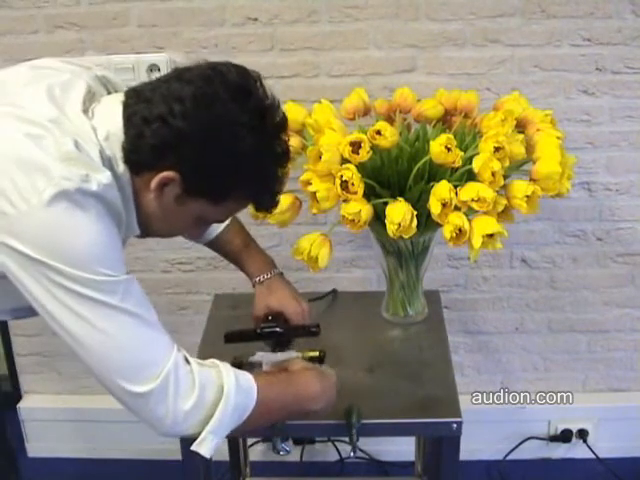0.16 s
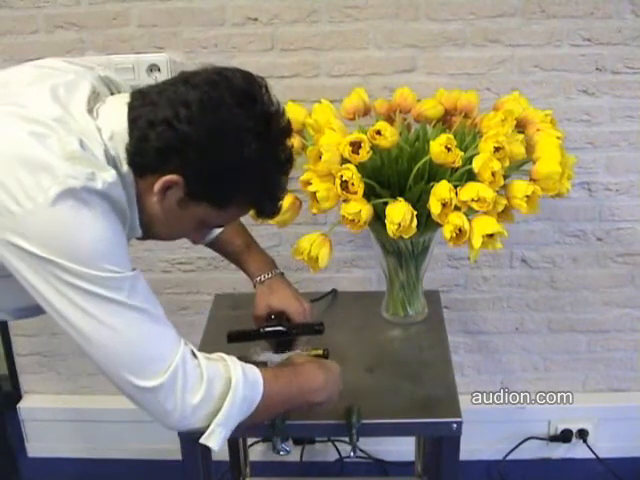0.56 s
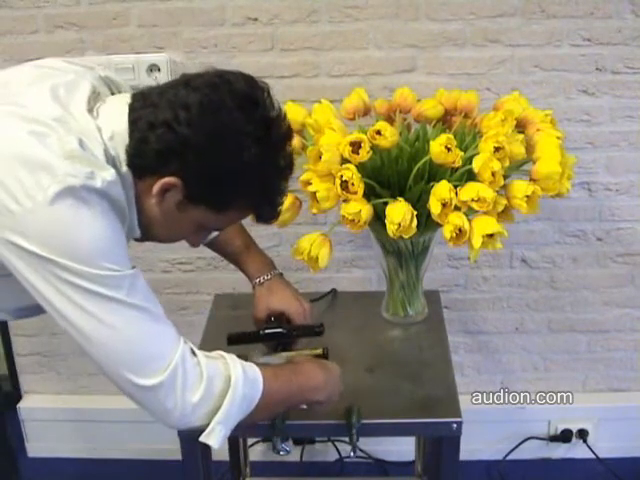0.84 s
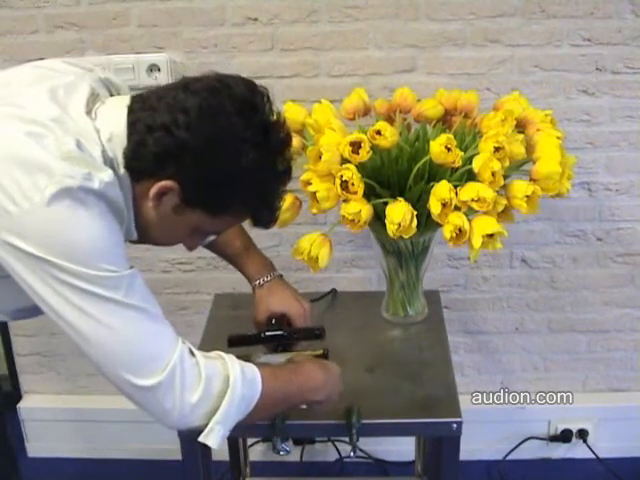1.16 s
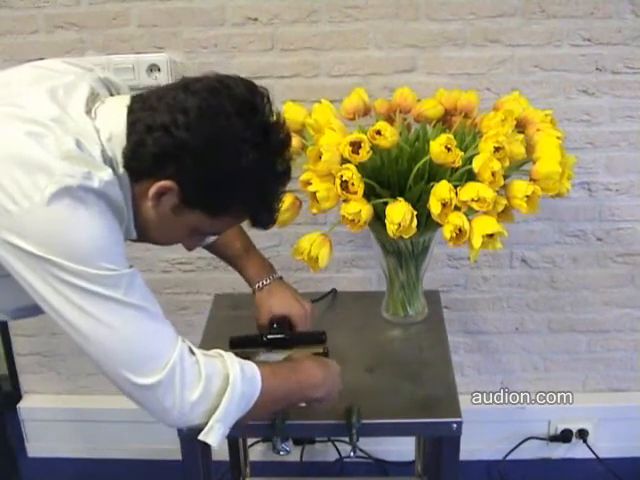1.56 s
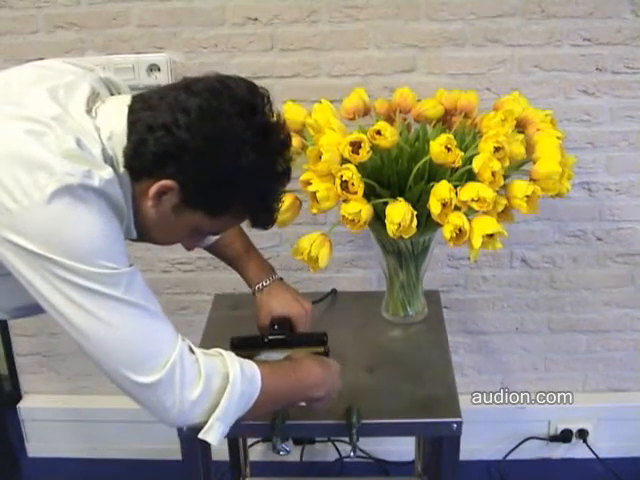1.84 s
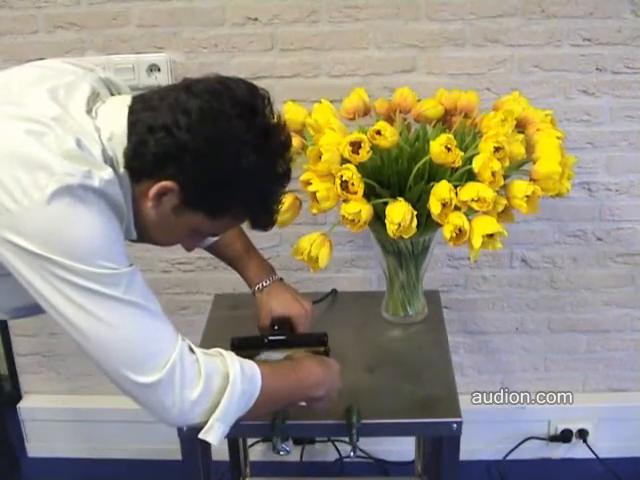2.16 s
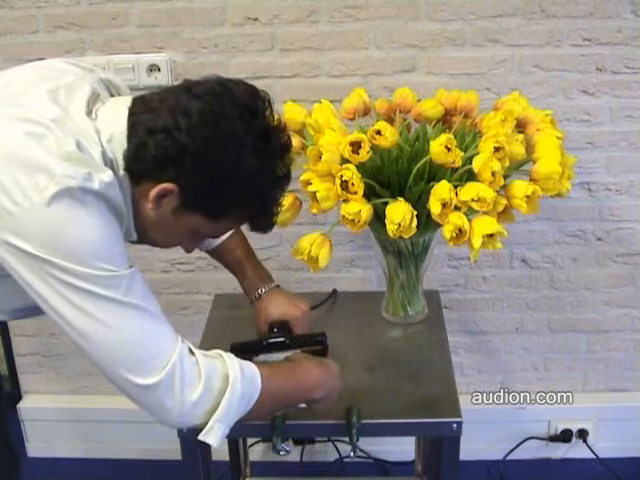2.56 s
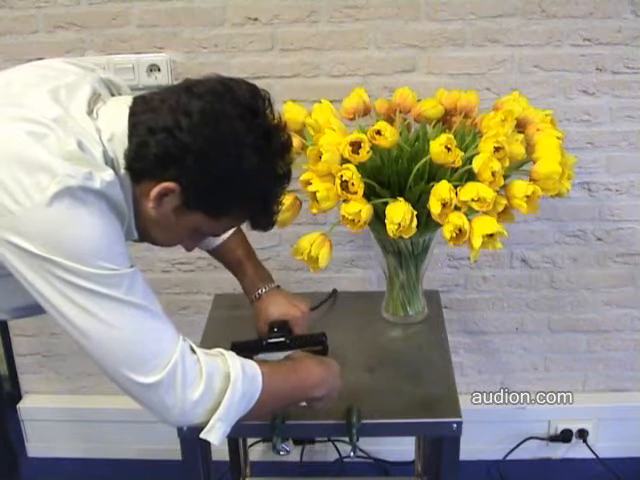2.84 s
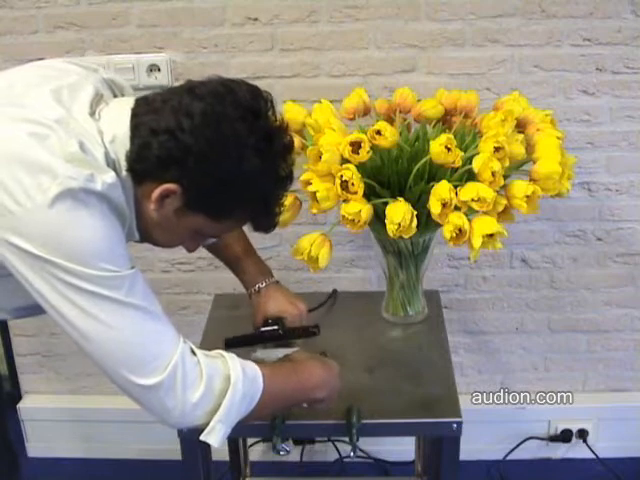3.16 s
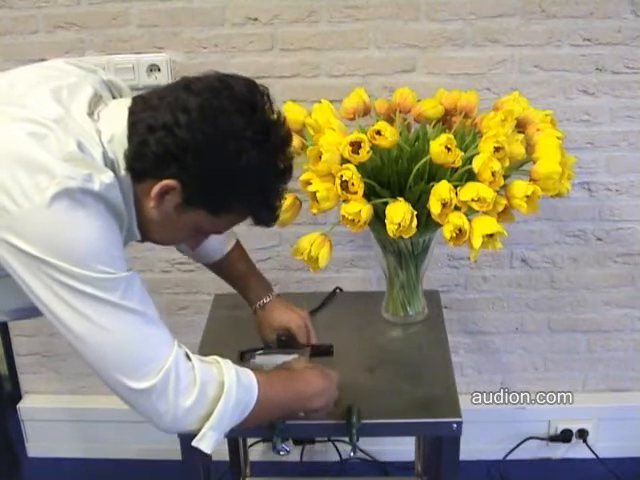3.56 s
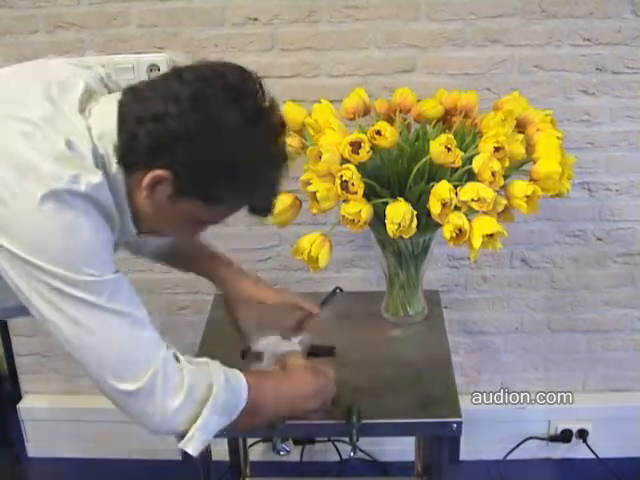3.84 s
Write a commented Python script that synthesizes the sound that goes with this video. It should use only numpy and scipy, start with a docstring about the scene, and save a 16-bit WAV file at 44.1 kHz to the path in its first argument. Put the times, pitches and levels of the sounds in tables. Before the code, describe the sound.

A hand sealer held shut over a steel table: low ventilation hum, soft hiss and a thin, steady motor whine run throughout. Faint ticks come at 0.4, 0.7 and 1.4 s, then sharper clicks and creaks around 2.3-2.6 and 3.1 s. A low tone swells near 3.3 s. From about 3.6 to 3.9 s the tool springs open, clattering loudly with clipped metallic blows, a soft thump and short hard-room echo.

```python
"""Ventilation hums and hisses throughout, and a small fast motor, a stack of shaft-order sines, whines close by.
A hand sealer held shut ticks and creaks: spiky noise chatters ring the resonances of its jaws.
Late on, a low tone swells and rises; then the sealer springs open and clatters on a steel table top,
its blows ringing plate and tool body over a soft low thump. Noise tails answer as a hard-walled room.
The loudest blows clip."""
import sys
import numpy as np
from scipy import signal
from scipy.fft import rfft, irfft, next_fast_len
from scipy.io import wavfile
from scipy.ndimage import uniform_filter1d, map_coordinates

SR = 44100
rng = np.random.default_rng(int(sys.argv[2]) if len(sys.argv) > 2 else 0)


def wrap_up_sound(samples):
    """Save the sound to the file named by the first command line argument, as 16-bit audio."""
    columns = np.atleast_2d(samples).T
    # keep every value between -1 and 1, then stretch to whole-number steps
    tamed = np.clip(columns, -1, 1)
    steps = np.round(tamed * 32767).astype(np.int16)
    wavfile.write(sys.argv[1], SR, steps)


def invert_db(level):
    """Linear amplitude ratio for a level in decibels (20 dB per decade), elementwise."""
    return 10 ** (np.asarray(level, dtype=float) / 20)


N = 176400  # samples, 4 s


def unit(x):
    """Scales to rms 1."""
    return x / np.sqrt(np.mean(x ** 2) + 1e-20)


def along(points, hz):
    """Reads (f, value) points on a log frequency axis."""
    f, value = np.transpose(points)
    return np.interp(np.log(hz + 1), np.log(f + 1), value)


def curves(rows):
    """Draws one automation curve for each column after the time."""
    s, *columns = np.transpose(rows)
    return [np.interp(np.arange(N) / SR, s, column) for column in columns]


def wobble(rate):
    """A smooth random curve with rate knots a second."""
    knots = rng.standard_normal(int(N * rate / SR) + 4)
    return map_coordinates(knots, [np.arange(N) * rate / SR])


def filtered(x, response):
    """Filters x by a complex response of frequency."""
    n = x.shape[-1]
    size = next_fast_len(n + 8192)
    spectrum = rfft(x, size) * response(np.fft.rfftfreq(size, 1 / SR))
    return irfft(spectrum, size)[..., :n]


def causal(gain):
    """The minimum-phase response with this gain, so that nothing sounds before the hit."""
    cepstrum = irfft(np.log(gain + 1e-6))
    half = len(cepstrum) // 2
    cepstrum[1:half] *= 2
    cepstrum[half + 1:] = 0
    return np.exp(rfft(cepstrum))


def spread(pair, alike):
    """Turns two unrelated signals into left and right with the given likeness."""
    def mid_side_gain(hz):
        angle = np.arccos(np.clip(along(alike, hz), -1, 1)) / 2
        return np.array([np.cos(angle), np.sin(angle)])

    mid, side = filtered(pair, mid_side_gain)
    return np.array([mid + side, mid - side])


# spectrum of the ventilation hiss: f/Hz, relative density/dB per Hz
AIR_SPECTRUM = [(12, -40), (25, -18), (45, 1), (70, -4.5), (112, 0.5), (163, -1.5), (250, -0.5),
                (370, -4.5), (560, -7), (900, -10), (1330, -13), (2500, -17), (5000, -23.5), (9000, -31),
                (11500, -33.5), (13600, -36), (16000, -60)]
# stereo width of the hiss: f/Hz, left-right likeness (1 = mono)
AIR_LIKENESS = [(40, .8), (90, 0.73), (160, .65), (350, 0.6), (600, .52), (1000, 0.48), (1800, 0.59),
                (4000, 0.8), (7000, 0.44), (10000, 0.41), (13000, 0.34)]


def ventilation_hiss():
    """Air noise, shaped in frequency, with faint patches of louder and softer spectrum."""
    level_db, drift_db, drift_rate, patch_db = -45, 0.41, 2.37, 1.22  # rate in knots/s
    z = signal.stft(rng.standard_normal((2, N)), nperseg=512)[2]
    patches = uniform_filter1d(rng.standard_normal(z.shape[1:]), 6, 0)  # blurred over frequency
    patches = unit(uniform_filter1d(patches, 14, 1))  # and over time
    noise = signal.istft(z * invert_db(patch_db * patches), nperseg=512)[1][:, :N]
    noise = filtered(noise, lambda hz: invert_db(along(AIR_SPECTRUM, hz)))
    return invert_db(level_db + drift_db * wobble(drift_rate)) * unit(spread(noise, AIR_LIKENESS))


# wavering hum tones: f/Hz, width/Hz, rms level/dB, pan/dB (added left, taken off right)
HUM_TONES = [(92, 5.08, -57, 1), (123.1, 2.14, -52, 0.5), (200.4, 6.73, -58.5, 1),
             (216.5, 5.02, -49.5, 0.8), (249, 6.25, -61, 1.5), (320, 8.37, -61, 3), (425.4, 6.15, -62.5, 1),
             (498.6, 3.5, -53, 0.2), (513.3, 3.05, -57.5, -0.2)]


def ventilation_hum():
    """Low sines; a greater width means more pitch drift and a faster level waver."""
    drift_share, drift_rate, waver_db = 0.2, 9, 3  # share of the width, knots/s
    out, t = np.zeros((2, N)), np.arange(N) / SR
    for hz, width, db, pan_db in HUM_TONES:
        drift = np.cumsum(drift_share * width * wobble(drift_rate)) / SR
        tone = np.sin(2 * np.pi * (hz * t + drift) + rng.uniform(0, 2 * np.pi))
        tone = unit(tone * invert_db(waver_db * wobble(width)))
        out += tone * invert_db(db + np.array([[pan_db], [-pan_db]]))
    return out


# the passing low tone: t/s, f/Hz, rms level/dB
SWELL_PATH = [(2.95, 84, -57), (3.15, 84.1, -51), (3.35, 87, -47.5), (3.55, 90, -53), (3.7, 93.6, -60)]


def low_swell():
    """One centred sine that swells while its pitch climbs, then fades."""
    fade_in, fade_out = (2.75, 84, -90), (3.87, 93.6, -90)
    hz, db = curves([fade_in, *SWELL_PATH, fade_out])
    return np.sqrt(2) * invert_db(db) * np.sin(2 * np.pi * np.cumsum(hz) / SR)


# the whine, fifth multiple of the motor shaft: t/s, f/Hz, reference level/dB
WHINE_PATH = [(0.0, 1459, -45), (0.65, 1467, -42), (1.13, 1465, -43), (2.3, 1467, -42.5), (2.8, 1474, -45),
              (3.14, 1469, -43), (3.46, 1472, -45), (3.56, 1472, -42), (3.6, 1474, -45)]
# harmonics of the shaft: multiple, rms level/dB against the reference
SHAFT_HARMONICS = [(1, -16), (4, -18.5), (5, -2), (6, -20)]


def motor_whine():
    """Sines at multiples of one shaft speed glide together; each wavers in level."""
    waver_db, waver_rate, pan_db = 0.5, 7.91, -1.2  # rate in knots/s; pan added left, taken off right
    hz, db = curves(WHINE_PATH)
    shaft_angle = 2 * np.pi * np.cumsum(hz / 5) / SR
    tone = np.zeros(N)
    for multiple, order_db in SHAFT_HARMONICS:
        level = invert_db(db + order_db + waver_db * wobble(waver_rate))
        tone += level * np.sin(multiple * shaft_angle + rng.uniform(0, 2 * np.pi))
    return np.sqrt(2) * tone * invert_db([[pan_db], [-pan_db]])


# decay of the room: f/Hz, t60/s
ROOM_DECAY = [(100, 0.32), (500, 0.53), (2000, 0.44), (5000, 0.31), (11000, 0.27)]
# stereo width of the room: f/Hz, left-right likeness (1 = mono)
ROOM_LIKENESS = [(100, .92), (500, 1), (2000, .96), (4500, .99), (6500, .96), (9500, .7), (11500, .9),
                 (13000, .99)]


def room_tail():
    """A fresh stereo noise tail, left energy 1; each frequency dies at its own speed after a short gap."""
    gap_s = 0.004
    hz, t, z = signal.stft(rng.standard_normal((2, SR * 3 // 4)), SR, nperseg=256)
    decay = invert_db(-60 * t / along(ROOM_DECAY, hz)[:, None])
    tail = spread(signal.istft(z * decay, SR, nperseg=256)[1], ROOM_LIKENESS)
    return np.pad(tail / np.linalg.norm(tail[0]), ((0, 0), (round(gap_s * SR), 0)))


def chatter_burst(t, length):
    """Spiky noise that builds fast and dies over its length: surfaces rattling on each other."""
    rise_s, spiky_db = 0.0006, 4.5
    grains = rng.standard_normal(len(t)) * invert_db(spiky_db * rng.standard_normal(len(t)))
    return grains * np.exp(-t / length) * (1 - np.exp(-t / rise_s))


def whitening(chatter):
    """A gain of frequency that evens out the broad lumps in one burst's spectrum."""
    even_hz = 400  # smoothing band
    n = len(chatter)
    power = uniform_filter1d(np.abs(rfft(chatter)) ** 2, size=int(even_hz * n / SR))
    lumps = np.sqrt(power)
    return lambda f: np.sqrt(lumps.mean() / np.interp(f, np.fft.rfftfreq(n, 1 / SR), lumps))


def body_ring(modes, ring_db):
    """A gain of frequency: the direct sound plus resonant modes, struck unevenly each time."""
    scatter_db = 3.5
    mode_db = [db + ring_db + scatter_db * rng.standard_normal() for _, _, db in modes]

    def gain(f):
        total = 1
        for (centre, width, _), db in zip(modes, mode_db):
            total = total + invert_db(db) * width * f / np.abs(centre ** 2 - f ** 2 + 1j * f * width)
        return total
    return gain


def contacts(rows, colour, modes, gain_db, room_db):
    """Each contact is a chatter that rings the body and is answered by the room."""
    out, t = np.zeros((2, N + 2 * SR)), np.arange(SR // 4) / SR
    for s, db, tilt_db, length, ring_db in rows:
        chatter = chatter_burst(t, length)
        ring, white = body_ring(modes, ring_db), whitening(chatter)

        def response(f):
            tilted = along(colour, f) + tilt_db * np.log2((f + 50) / 2000)
            return causal(invert_db(tilted) * ring(f) * white(f))

        hit = filtered(chatter, response)
        # level by energy over the length, so long rings do not raise it
        hit = hit * invert_db(db + gain_db) / np.sqrt(np.sum(hit ** 2) / (length * SR / 2))
        wet = signal.fftconvolve(hit[None], room_tail(), axes=1)
        start = round(s * SR)
        out[:, start:start + len(t)] += hit
        out[:, start:start + wet.shape[1]] += invert_db(room_db) * wet
    return out[:, :N]


def low_thump():
    """A soft, decaying, mostly sub-audible swing, downward first, during the loudest blows."""
    start_s, hz, level_db, t60_s = 3.701, 14, -18.5, 0.35
    t = np.maximum(np.arange(N) / SR - start_s, 0)
    return -invert_db(level_db - 60 * t / t60_s) * np.sin(2 * np.pi * hz * t)


# ticks of the jaws and the film: t/s, level/dB before the trim, tilt/dB per octave,
# length/s, ring/dB added to every mode
JAW_TICKS = [(.433, -40, .1, 0.0016, -3), (.665, -38, -.5, 0.0025, -3), (1.389, -45, 3, .002, -3),
             (2.3055, -24, 1.5, 0.0018, -2), (2.3105, -27.5, 3, .003, 1), (2.319, -32, -7, 0.0038, 4),
             (2.400, -32, 5, .0012, -3), (2.437, -42.5, -0.5, 0.033, -3), (2.5397, -25.5, 8.5, 0.0021, 5),
             (2.544, -30, -1, .003, -1), (2.615, -26, -.5, 0.00076, -3), (2.619, -30, -4, 0.0018, -5),
             (2.871, -40, 2.1, .002, -3), (2.962, -43, 6, .002, -3), (3.106, -36.5, 3, 0.0087, -5),
             (3.117, -31, 0, .003, -5), (3.1215, -31.5, 6, 0.004, -6), (3.1295, -35, 4, .0012, -3),
             (3.1415, -30, 4, 0.0015, -5), (3.163, -28.5, 6.5, .003, -6), (3.167, -25.5, -5.5, 0.0053, 7),
             (3.178, -37, -6, 0.007, 6), (3.4615, -25, 4.5, 0.00058, -3), (3.475, -37, 3, .001, -3)]
# colour of the ticks: f/Hz, level/dB
TICK_SPECTRUM = [(200, -36), (800, 1), (2500, 5), (6000, -2.5), (11000, -11), (14000, -38)]
# resonances of the jaws: f/Hz, width/Hz, level/dB against the direct sound
JAW_MODES = [(1174, 25, 8), (1720, 46, -1.5), (2220, 45, 9), (2400, 54, 5), (3600, 150, 3),
             (6600, 350, -14), (8600, 700, -1.5)]


def sealer_ticks():
    """Jaws and film tick and creak as small contacts ring the jaws."""
    return contacts(JAW_TICKS, TICK_SPECTRUM, JAW_MODES, gain_db=-4.5, room_db=-6.5)


# blows of the tool on the table: t/s, level/dB before the trim, tilt/dB per octave,
# length/s, ring/dB added to every mode
TABLE_BLOWS = [(3.545, -27, -2.5, 0.033, 12), (3.6245, -4, -0.75, 0.012, 5), (3.633, 1, -0.5, 0.0044, 7),
               (3.647, -3, -3, 0.0066, 6), (3.664, -5, -1, 0.012, 7.5), (3.674, -10.5, -1, 0.0058, 5),
               (3.7002, 5.5, 2.5, 0.0089, 6), (3.705, 3.5, 0.2, 0.0068, 11), (3.716, 1.3, -2, 0.0059, 7),
               (3.736, -1.5, 0, 0.0054, 7), (3.748, 0, -0.5, 0.0073, 3), (3.7555, 6.5, 0.56, .004, 8),
               (3.7605, 2.5, -.5, 0.0058, 3.5), (3.7655, -0.4, 0.5, 0.0062, 11), (3.789, -2, -0.5, .007, 5),
               (3.8305, -2, -0.5, 0.0048, 7), (3.838, -2, -2, 0.0061, 7), (3.870, -15.5, -3.5, 0.0038, 6),
               (3.908, -14.5, -4.5, 0.0058, 11)]
# colour of the blows: f/Hz, level/dB
BLOW_SPECTRUM = [(15, -50.5), (60, -23), (200, -14.5), (500, -11), (950, -8), (1600, -12), (2650, -10.5),
                 (4500, -17.5), (6000, -17), (9000, -19), (11500, -23), (12300, -33), (14000, -67)]
# resonances of steel plate and tool body: f/Hz, width/Hz, level/dB against the direct sound
TABLE_MODES = [(203, 20, -3), (378, 8, 3), (489, 23, 0), (603.6, 10.4, 4.5), (744, 19, -5), (933, 27, 3),
               (988, 16, 1.5), (1140, 20, -6), (1360, 20, -1.5), (1477, 46, -0.5), (1614, 17, -3.5),
               (2320, 20, -6), (4380, 270, -1.5), (5430, 170, -6), (6150, 60, -8)]


def table_clatter():
    """The sprung tool strikes the steel top in quick blows that ring plate and body."""
    return contacts(TABLE_BLOWS, BLOW_SPECTRUM, TABLE_MODES, gain_db=-9.5, room_db=-1.5)


def scene():
    """Mixes room air, motor, table and sealer."""
    background = ventilation_hiss() + ventilation_hum() + low_swell() + motor_whine()
    return background + low_thump() + sealer_ticks() + table_clatter()


# level balance of the microphone pair: f/Hz, left minus right level/dB
PAIR_BALANCE = [(40, -3.5), (120, 2.5), (250, 1.5), (400, 2.1), (800, -0.4), (2500, -0.5), (8000, -0.3),
                (10000, 1.5), (12000, -.1)]
# phase of the microphone pair: f/Hz, lead of the left/rad
PAIR_LEAD = [(40, -0.23), (150, -.02), (400, 0.34), (900, 0.18), (1800, .03), (12000, -0.18)]


def microphone_pair(dry):
    """Two microphones differ a little in level and phase, half the difference on each side."""
    side = np.array([[0.5], [-0.5]])

    def response(hz):
        return invert_db(side * along(PAIR_BALANCE, hz)) * np.exp(1j * side * along(PAIR_LEAD, hz))
    return filtered(dry, response)


def peak_clipping(x):
    """Flattens the loudest peaks with a fairly hard knee."""
    top, hardness = 1.02, 6  # full scale = 1
    return x / (1 + np.abs(x / top) ** hardness) ** (1 / hardness)


def low_pass(x):
    """Removes everything above the highest recorded frequency."""
    return signal.sosfilt(signal.butter(12, 13710, fs=SR, output="sos"), x)


def record(dry):
    """Picks the scene up in stereo, with the loudest peaks clipped."""
    mix = peak_clipping(microphone_pair(dry))
    return low_pass(mix)


dry = scene()
out = record(dry)
wrap_up_sound(out)
```